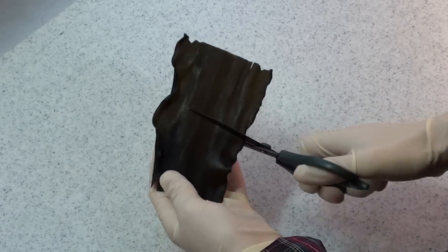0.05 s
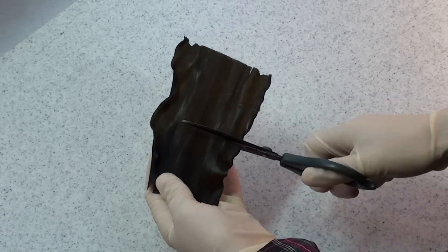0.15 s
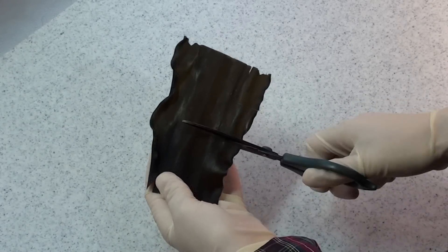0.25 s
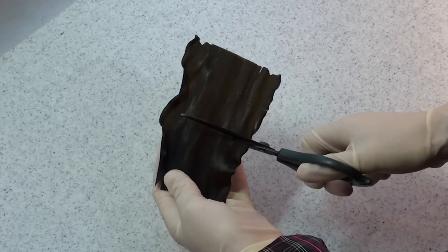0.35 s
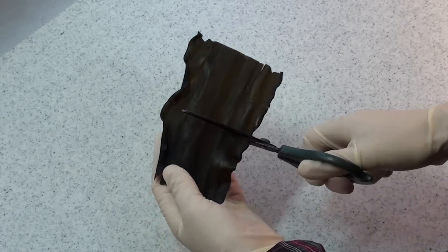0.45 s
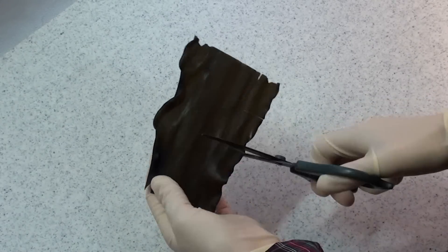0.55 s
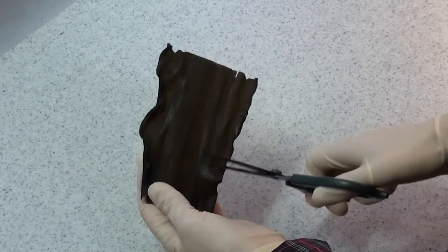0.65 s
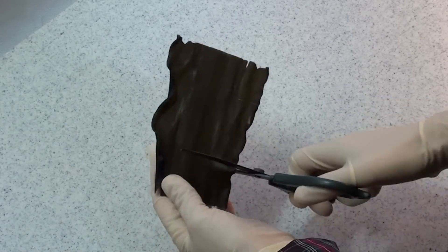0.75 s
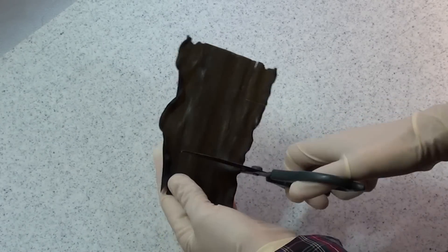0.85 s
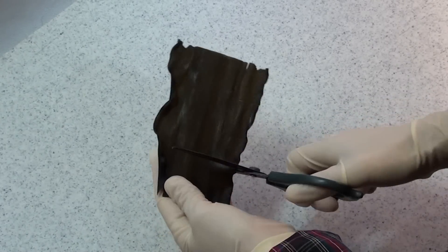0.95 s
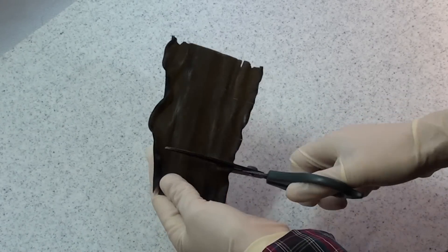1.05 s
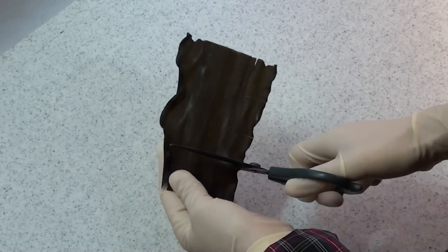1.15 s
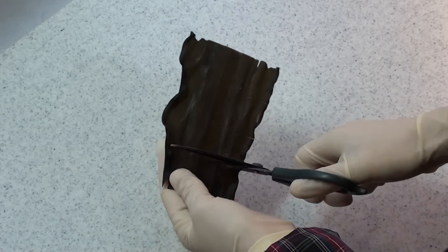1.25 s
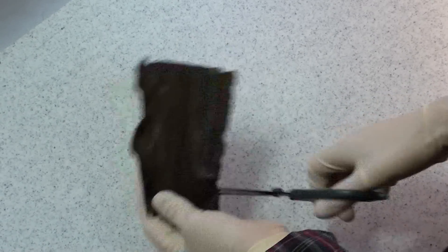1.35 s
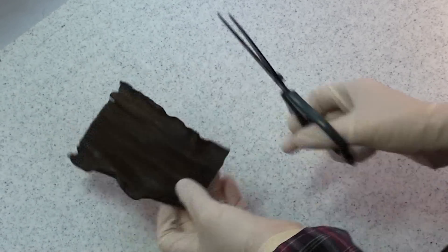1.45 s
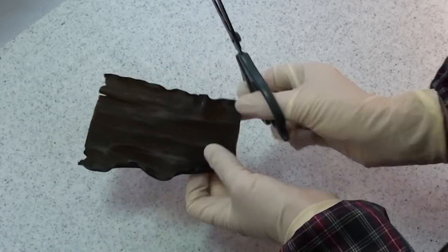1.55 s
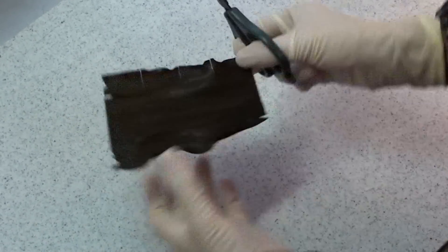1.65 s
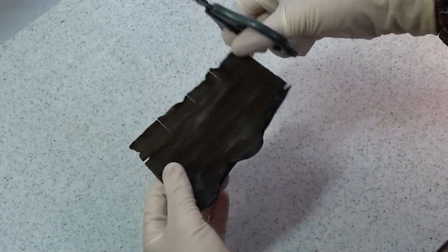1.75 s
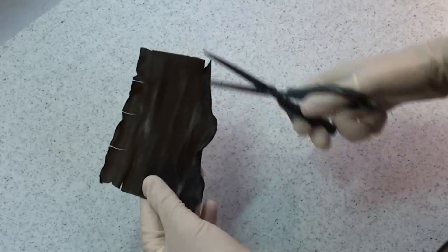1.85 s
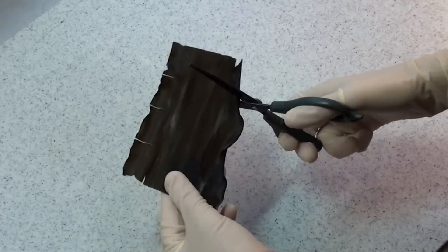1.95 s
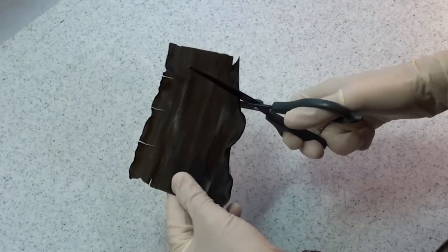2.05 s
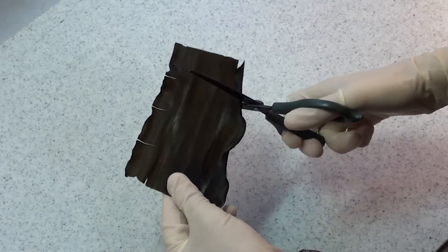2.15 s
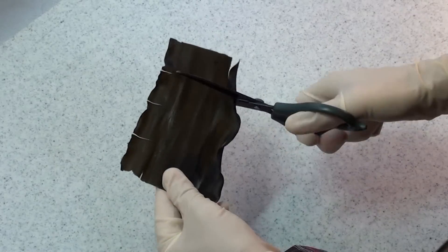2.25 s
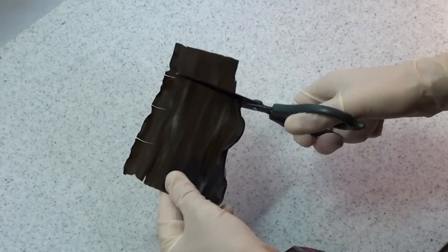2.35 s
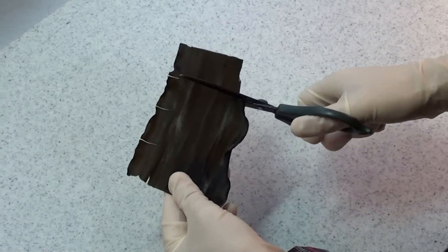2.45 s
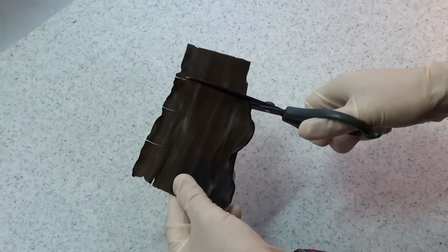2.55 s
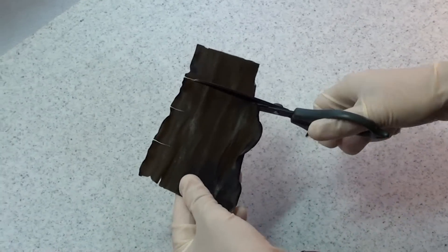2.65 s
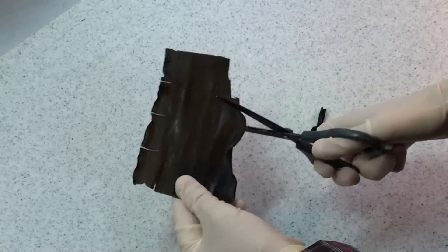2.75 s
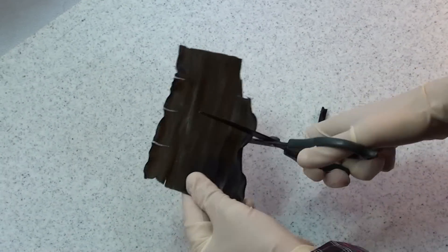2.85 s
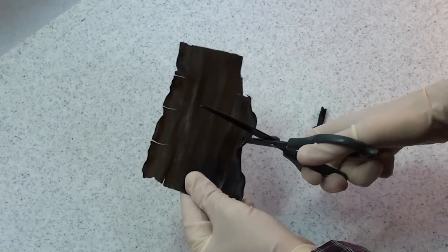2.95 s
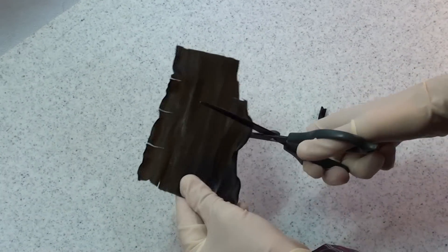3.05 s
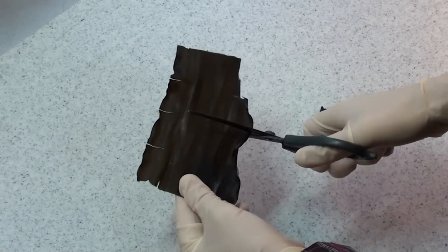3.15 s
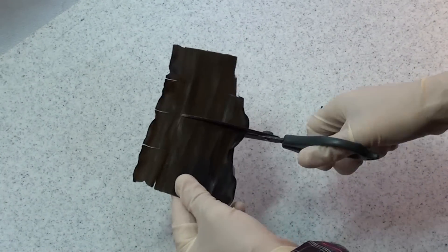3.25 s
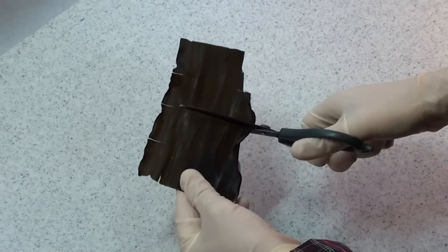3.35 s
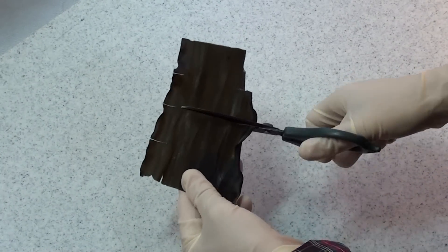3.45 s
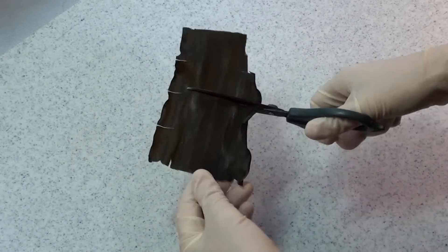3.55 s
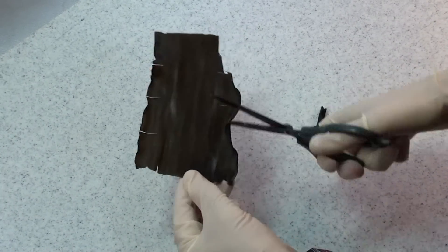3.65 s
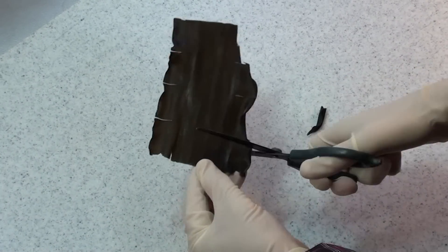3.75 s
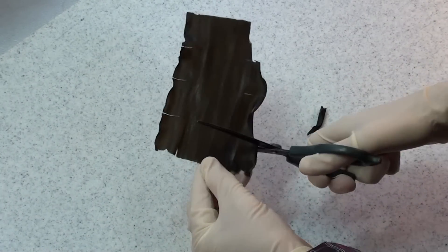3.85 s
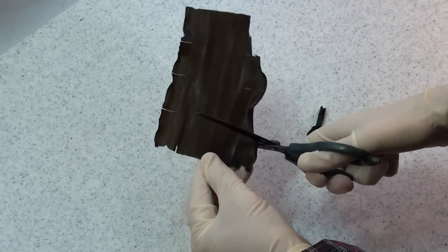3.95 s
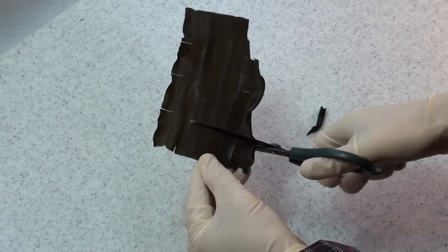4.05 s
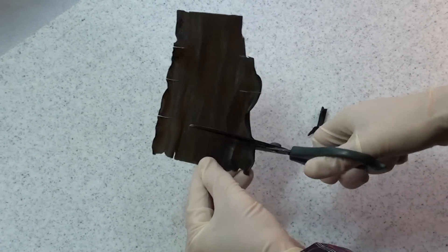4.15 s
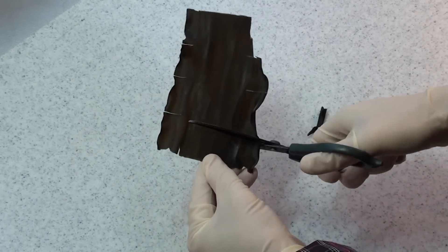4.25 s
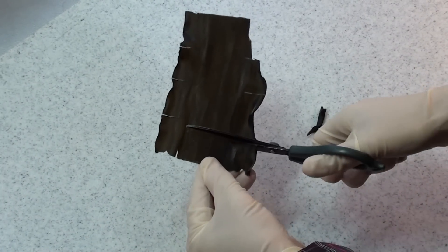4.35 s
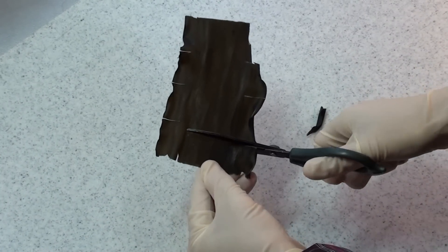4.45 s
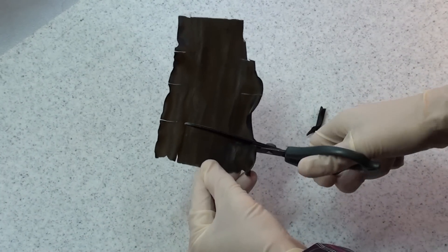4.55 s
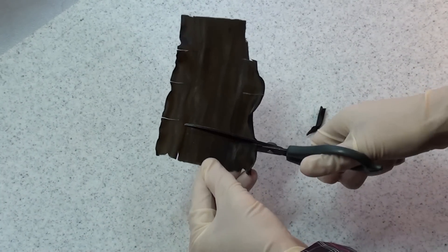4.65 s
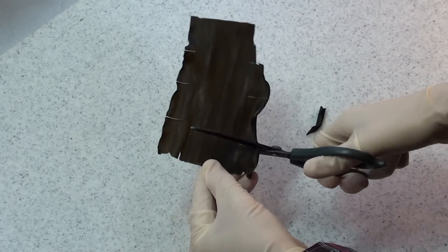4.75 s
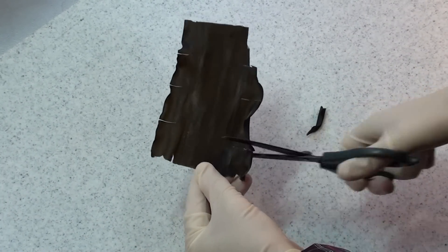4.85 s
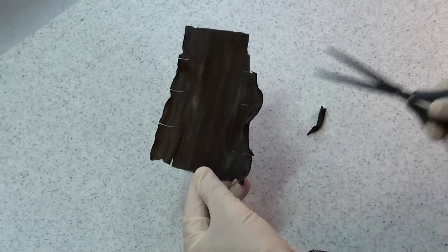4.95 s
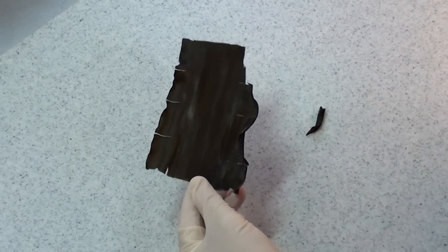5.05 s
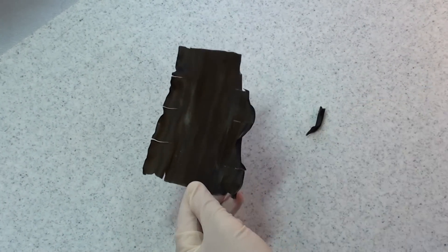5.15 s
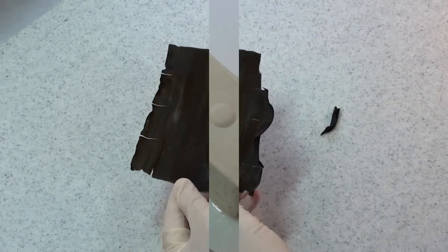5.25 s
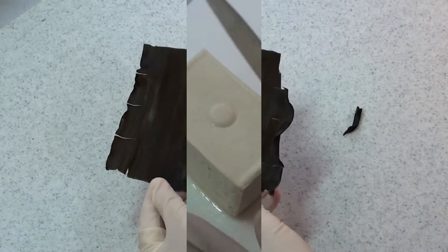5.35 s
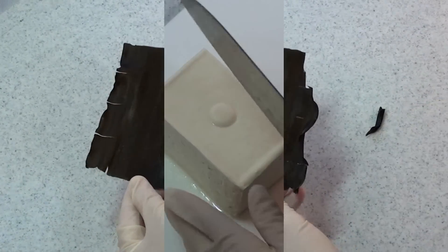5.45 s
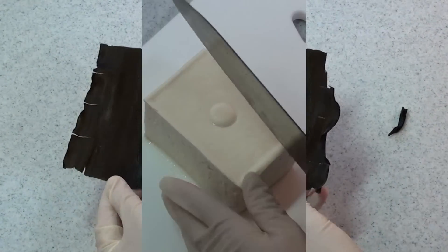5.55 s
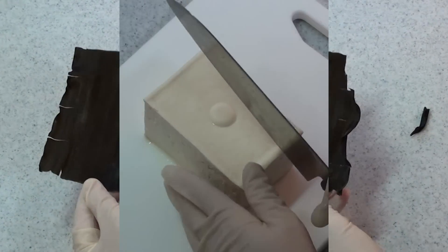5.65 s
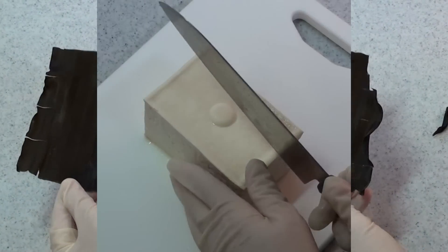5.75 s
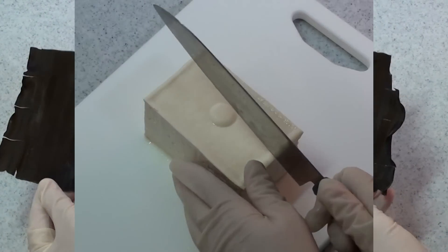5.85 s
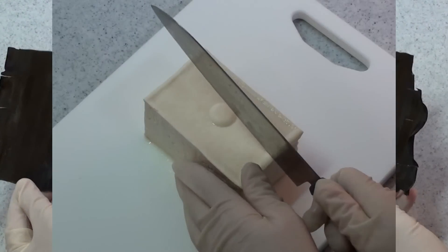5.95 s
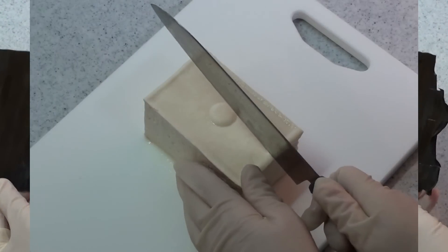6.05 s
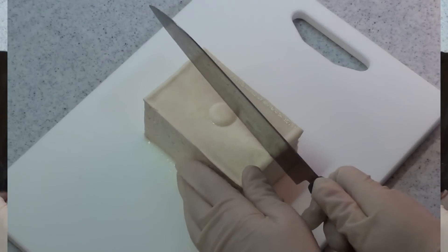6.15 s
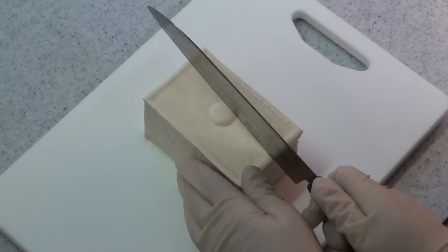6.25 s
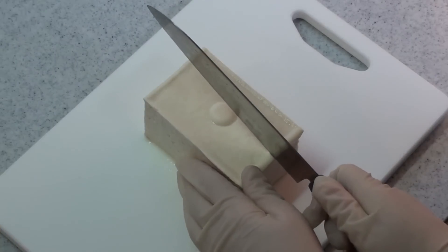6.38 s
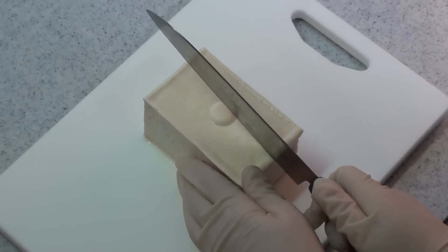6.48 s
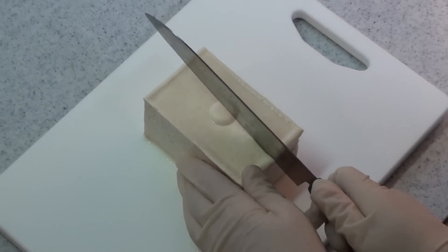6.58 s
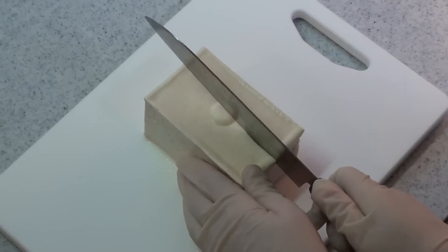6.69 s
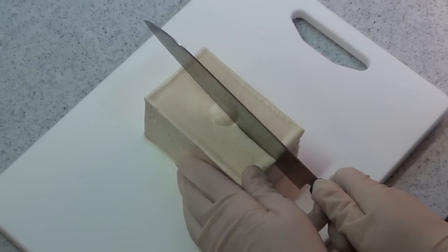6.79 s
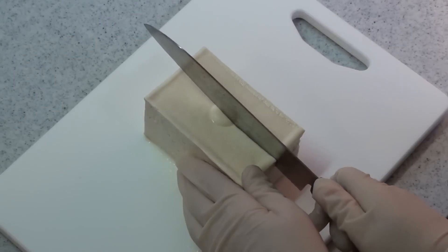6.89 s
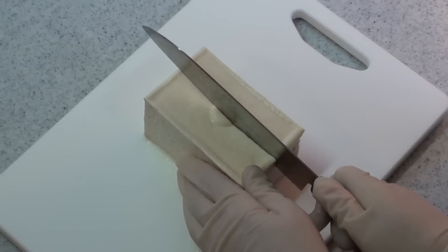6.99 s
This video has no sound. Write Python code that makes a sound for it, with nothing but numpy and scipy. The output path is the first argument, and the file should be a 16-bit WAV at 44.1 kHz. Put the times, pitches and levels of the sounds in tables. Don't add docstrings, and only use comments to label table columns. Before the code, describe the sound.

Sharp dry snaps and small crunches of cutting stiff dried kelp, a sudden change to deeper fridge rumble, a soft glove rub, a knife knock.

```python
import sys
import numpy as np
from scipy import signal
from scipy.fft import rfft, irfft, next_fast_len
from scipy.io import wavfile
from scipy.ndimage import uniform_filter1d

SR = 44100
rng = np.random.default_rng(int(sys.argv[2]) if len(sys.argv) > 2 else 0)


def transcribe(signal):
    frames = np.atleast_2d(signal).T
    limited = np.clip(frames, -1, 1)
    pcm = np.round(limited * 32767).astype(np.int16)
    wavfile.write(sys.argv[1], SR, pcm)


def ratio(d):
    e = np.asarray(d, float) / 20
    return 10 ** e


N = 309582

# [t/s, level/dB, blade share/dB, brittleness/dB]
CRUNCHES = [(.138, -49.5, 8, 0), (.2675, -50.5, 8.5, -17), (0.5465, -31.5, 6.5, -22), (.6293, -49, -17, 10),
            (0.6688, -57, 10, 6), (0.824, -64, 4, -2), (1.0203, -39, -5, 2), (1.0318, -32, 2, 0),
            (1.2255, -51, 7, -15), (1.27, -49, 1, -5), (1.376, -42.5, 6, -10), (1.4564, -52, 6, 7),
            (1.785, -53, 8, 3), (1.9912, -44.5, 9, 2), (2.0003, -42, 1.5, -7), (2.16, -47, 3, -9),
            (2.259, -43, -5, 0), (2.2997, -42.5, 1, 10), (2.3055, -31, 6, 0), (2.3175, -38, 5, 1),
            (2.3254, -27, 3, 4), (2.4115, -45, -11, 2), (2.3009, -43, 9, 4), (3.343, -44, -19, -15),
            (3.619, -44, 9.5, -5), (3.6322, -47.5, -15, 0), (3.8796, -43.5, -10, -12), (4.621, -49, 6, -9),
            (4.7906, -56, 12, -15), (3.928, -48.5, 2, -12), (3.9782, -48, 5, -2), (2.123, -44, 0, 0),
            (4.4312, -46, -15, 17), (1.3123, -51, 1, -5), (2.3306, -47, -7, 3)]
TEARS = [(0.149, -58, 1, 7), (0.312, -52, 4, -5), (0.3227, -50, -3, 8), (0.484, -49, -14, 10.5),
         (0.6232, -38, -19, 2), (1.022, -36, -8, -5), (1.0392, -26, 6.5, -4), (1.0415, -33, -4, 6),
         (1.1547, -46, 6, 2), (1.3016, -49, 7, -1), (1.417, -48, -4, 2), (1.443, -41, -8, -1),
         (1.5589, -55, -6, 5), (1.658, -45, 11.5, 3), (1.8622, -59, -11, 14), (2.435, -48, -17, -1),
         (2.332, -36.5, 11.5, 5), (2.4135, -42, -13, 2), (2.7368, -46, 3, -3), (2.8734, -62, -6, 14),
         (3.1266, -49.5, -9, 7), (3.2193, -48, 4, 12.5), (3.3207, -35.5, -2.5, -8), (4.224, -48, 4, -2),
         (4.346, -51, -13, -4), (4.1454, -50, -6, 3), (4.3216, -49, -8, 2), (1.6348, -56, 3, -3)]
FLAKES = [(.1665, -57.5, 12.5, -8), (.218, -52, 4, -10), (2.061, -55, 12, -1), (2.7266, -48, -15, -10),
          (2.917, -62, -8, 9), (3.8665, -56, -4, 5), (3.912, -50, 0, 0), (2.3809, -38, -13, 2),
          (.626, -43.5, -15, 0), (0.8258, -49.5, 19, -9), (1.3885, -55, 3, -8), (1.3954, -43.5, -2, 4),
          (1.61, -58, -8, 8), (1.665, -54, 2, 4), (1.671, -57, -6, 4), (1.771, -63, -10, 12),
          (1.4225, -54, -3, 4), (2.4478, -52, -10, -4), (2.4676, -53, -15, 4), (2.594, -57, -8, 2),
          (2.7383, -45.5, 4.5, 0), (2.7442, -48, 0, 5), (3.2627, -48, -3, 0), (4.3515, -48, -8, 4),
          (4.4379, -50, -15, 8), (1.0896, -41, 2, -3), (0.5487, -39, 8, -5)]
# [shower t60/s, topmost over crisp zone/dB]
FRACTURE_KINDS = [
    (0.0079, 0.5),
    (0.012, -6),
    (0.0071, 2),
]
# [t/s, level/dB, blade share/dB, brittleness/dB, topmost zone/dB]
SNAPS = [(.5436, -33, 1, 8.5, -12), (.7202, -33.5, 4.5, 3.5, 0), (.7208, -36, 1, -5, 0),
         (1.021, -25, -9, -1, 12), (1.0222, -30, 3, -3, 0), (1.0364, -28, -1, 0, 5),
         (1.0371, -32, -10, -3, 3), (1.0858, -30.5, -1, 0.5, -2), (1.0863, -33.5, 1.5, 0, -3),
         (1.2125, -39, 8, -6, 2), (1.214, -36, -2, -7, 6), (1.2205, -44, 6, -15, 0),
         (1.2302, -40, 1, -5, 0), (1.2366, -46, 8, -4, 0), (1.2599, -38, 9, -6, 0),
         (1.2612, -35, -12, -4, 0), (1.266, -36, 2, 0, -6), (1.3069, -35.5, -2, -3, 1),
         (1.3926, -43, 1, -1, 5), (1.529, -43.5, -21, 2.5, 0), (1.6167, -43.5, 2.5, -2, 3),
         (1.824, -46.5, 0, 2.5, 4),
         (2.0068, -40, -3, -20, -2), (2.126, -32, -5, 0, -2), (2.3029, -32.5, 3, 6, 13.5),
               (2.316, -20.5, 1.5, 3, -12), (2.3239, -33.5, 6, 7, -3), (2.327, -32, 3, 0, 0),
               (2.3823, -30.5, -19, -1, 7), (2.3847, -41, -11, 3, 5), (2.389, -47, -23, 10, 0),
               (2.421, -50, -14, 2, 4), (2.4628, -41, -24, 2, 7), (2.4984, -44, 7, 4, 6),
               (2.848, -55, -3, 10, 0.5), (3.1292, -45, 11.5, -20, 0), (3.251, -47, -7, 1, 0),
               (3.2603, -42.5, -1, 7, -3), (3.8491, -47.5, 7.5, -7, 6), (4.1316, -47, -14, 3, 9),
               (4.1892, -38, -29, -3, 0), (4.3482, -41, -4, 2, 12), (4.3496, -37, -8, -1, 6),
               (4.4321, -33.5, -24, 13, 3.5), (4.5112, -30.5, -10.5, 1, -5), (3.2229, -42.5, 2.5, 9, -8)]
# [loudest t/s, length/s, level/dB, brightness/dB]
RUBS = [(0.14, 0.11, -63.5, -17), (0.322, 0.028, -54, -3), (0.525, 0.049, -69, 4), (0.626, 0.045, -71, 8),
        (3.904, .1, -71, -2), (1.47, .25, -74, 3), (0.664, .04, -73, 8), (1.425, 0.028, -75, 7),
        (1.555, .04, -77, 10), (1.034, 0.027, -42, -4), (1.156, 0.053, -53, -10), (1.384, 0.073, -58.5, -6),
        (1.444, 0.07, -68, -4), (1.522, 0.2, -67, -3), (1.643, 0.31, -71, 3), (1.81, 0.22, -70, -5),
        (2.166, 0.034, -60, -12), (2.331, 0.058, -48, 2), (2.741, 0.024, -56.5, 1.5),
        (2.871, 0.04, -73.5, 9), (3.124, 0.017, -66, 14), (3.227, 0.045, -64, -10), (3.331, 0.033, -59, -3),
        (3.648, 0.13, -65, -6), (3.865, 0.037, -65, -4), (4.22, 0.031, -61, -6), (4.575, 0.25, -68, -5),
        (4.786, 0.019, -54, -15), (4.869, 0.045, -70.5, 4)]
# [t/s, peak level/dB, f/Hz]
KNOCKS = [(0.55, -44, 1040), (.7205, -49, 840), (1.4, -38.5, 1700), (1.1, -38, 2250), (1.2301, -37, 1750),
          (1.2302, -39, 2400), (1.0859, -31.5, 2250), (2.3242, -30, 2330), (2.2998, -31, 2880),
          (1.804, -50, 1500), (1.8046, -45.5, 806), (2.1255, -43, 940), (2.1259, -25.5, 3130),
          (2.1264, -29, 2360), (2.324, -38, 1600), (1.3072, -37, 1860), (.7205, -55, 1500),
          (0.55, -44, 1790), (.544, -41, 3500), (2.316, -50, 1100), (2.737, -44.5, 1030), (3.13, -54, 970),
          (3.62, -52, 900), (4.3476, -14, 15700), (4.348, -45.5, 1600), (4.349, -10, 14800),
          (4.349, -43, 2500), (4.3494, -29, 6600), (4.4324, -46.5, 890), (4.432, -50, 1200),
          (4.433, -29.5, 4500), (4.433, -41.5, 1840), (4.5102, -35, 4600), (4.512, -42.5, 1650),
          (4.621, -51, 860), (5.824, -42, 1060), (5.8745, -51, 190), (1.0209, -18, 13300),
          (2.3028, -20, 13600), (2.4, -18, 9500), (1.0366, -32, 2390), (1.2608, -40, 2400),
          (1.215, -40, 2460), (4.4326, -23, 10100), (4.349, -22, 13000), (6.879, -45, 4900)]
# [t/s, board level/dB, steel share/dB, t60/s]
KNIFE_TAPS = [
    (5.607, -32, 1, 0.017),
    (5.6114, -36, -14, 0.026),
    (6.877, -67.5, 15, 0.0075),
]
# [t/s, pressure level/dB, slow over fast rub/dB]
GLOVE_SLIDE = [
    (5.237, -52.5, -6),
    (5.3, -53.5, -4),
    (5.43, -51.5, -5),
    (5.54, -54, -8),
    (5.62, -53.5, 1),
    (5.69, -56.5, 1),
    (5.74, -69, 3),
    (5.85, -66, 0),
]

# [f/Hz, width/Hz, level/dB]
BLADE_MODES = [(1645, 200, -6), (2130, 228, 2), (2400, 200, 5.5), (2705, 230, -1.5), (3120, 320, -3)]
SHEET_MODES = [(3780, 170, 0.5), (4604, 230, 1.5), (5660, 390, -0.5), (6370, 290, 2.5), (7000, 260, -3),
               (7650, 320, -1), (8570, 240, -7)]
CRISP_MODES = [(9180, 480, 2.5), (10170, 750, 3.5), (11000, 750, 0.5), (12000, 640, -2)]
TOPMOST_MODES = [(12400, 600, -2), (13360, 530, 0), (13370, 380, 7.5), (14200, 600, 0.5), (14900, 400, 0),
                 (15350, 400, 3), (16300, 360, -13)]
AIR_MODES = [(5500, 5500, 0)]
# [f/Hz, width/Hz, level/dB]
BOARD_MODES = [(390, 130, -2.5), (800, 160, 0), (1030, 150, 0), (1280, 200, -7), (1560, 180, -3),
               (1860, 180, 1), (2190, 280, -0.5), (2560, 260, 3.5)]
STEEL_MODES = [(3100, 400, -4), (3690, 240, 1.5), (4050, 300, -3.5), (4600, 600, -9), (5440, 450, -10),
               (5960, 320, -2), (7300, 500, -16)]
BLOCK_MODES = [(295, 71, -2.5), (470, 150, -3.5), (800, 150, -5), (1060, 180, -3), (1420, 100, -3),
               (1580, 91, -7), (1830, 110, -3)]

# [f/Hz, level/dB per Hz]
HISS = [(2500, -42), (3400, -6), (5000, -4), (7400, 0.5), (10000, -8), (14000, -21)]
SCRAPE = [(150, -18), (300, -3.5), (700, 1.5), (2500, -1.5), (3500, -5), (5000, -40)]
DRAG = [(3000, -40), (4300, -8), (5800, -5), (7000, -5), (9000, -25)]

# [t/s, rms level/dB]
WHINE_LEVEL = [(5.25, -65), (5.6, -76), (5.75, -66.5), (7.02, -69)]
# [t/s, level/dB]
BACKGROUND_GAIN = [(0, 2), (.6, 3), (2, 3), (5.2, 2.5), (7.02, -1)]
# [f/Hz, level/dB per Hz]
COUNTER_NOISE = [(25, -25), (60, -18), (90, -14), (125, -6.5), (200, -1), (330, -0.5), (500, -0.5),
                 (800, 3), (1400, 0.5), (2500, 0), (5000, -2.5), (10000, -6.5), (14500, -7)]
TABLE_NOISE = [(20, -11), (60, -17), (92, 0.5), (130, -9), (230, -6), (430, -9), (800, -9), (1500, -11.5),
               (3200, -16), (4650, -15.5), (6000, -18), (12500, -20), (14500, -23)]
# [f/Hz, correlation]
COUNTER_ALIKE = [(60, 1), (300, 0.91), (640, 0.72), (1400, 0.17), (3100, 0.041), (6800, 0.21),
                 (15000, 0.76)]
TABLE_ALIKE = [(60, 1), (130, 0.93), (290, 0.55), (640, 0), (1400, 0), (3100, 0.46), (6800, 0.92),
               (15000, 0.99)]
# [f/Hz, rms level/dB, unsteadiness/Hz]
COUNTER_LINES = [(90, -80, 3), (269.5, -66, 1), (332, -78, 2), (360, -76, 1), (720, -80, 3), (2518, -82, 2),
                 (7556, -68.5, 1)]
TABLE_LINES = [(87.7, -65.5, 4.4), (840, -75, 2.47), (4650, -76, 24.3)]
# [f/Hz, t60/s]
WALLS = [(800, 0.074), (2400, 0.056), (6000, 0.078), (15000, 0.06)]
# [t out/s, t in/s, t fully in/s]
CHANGE = (5.2298, 5.237, 5.247)
# [f/Hz, level/dB]
TREBLE_GATE = [(14400, -82), (15250, -79), (15400, -62), (16000, -66), (16100, -59.5), (16700, -57),
               (17000, 0)]


def unit(x):
    return x / np.sqrt(np.mean(x ** 2) + 1e-20)


def along(points, hz):
    f, v = np.transpose(points)
    return np.interp(np.log(hz + 1), np.log(f + 1), v)


def wobble(rate):
    knots = rng.standard_normal(round(N / SR) * 60)
    return np.interp(np.arange(N) * rate / SR, np.arange(len(knots)), knots)


def filtered(x, response):
    m = next_fast_len(N + SR // 2)
    return irfft(rfft(x, m) * response(np.fft.rfftfreq(m, 1 / SR)), m)[..., :N]


def ringing(x, modes):
    def response(f):
        h = 0
        for k, (centre, width, db) in enumerate(modes):
            resonance = 1j * f * width / (centre * centre - f * f + 1j * f * width)
            h = h + (-1) ** k * ratio(db) * resonance
        return h / np.sqrt(np.mean(np.abs(h) ** 2))
    return filtered(x, response)


def rush(spectrum, alike):
    def mid_side(hz):
        turn = np.arccos(np.clip(along(alike, hz), -1, 1)) / 2
        return ratio(along(spectrum, hz)) * [np.cos(turn), np.sin(turn)]
    mid, side = filtered(rng.standard_normal((2, N)), mid_side)
    return unit(np.array([mid + side, mid - side]))


def bursts(times, db, t60, snap_db):
    t = np.arange(SR // 20) / SR
    t60 = np.maximum(t60, .002)[:, None]
    unevenness = uniform_filter1d(rng.standard_normal((len(times), len(t))), size=16)
    clumps = ratio(2.5 * 4 * unevenness)
    swell = (1 - np.exp(-t / (0.028 * t60))) * ratio(-60 * t / t60)
    swell = swell * np.sqrt(0.0072 / t60)
    where = ((times * SR).astype(int)[:, None] + np.arange(len(t))).ravel()
    out = []
    for level, snap in zip(db, snap_db):
        shower = rng.standard_normal(clumps.shape) * clumps * swell
        shower[:, 0] = -ratio(snap) * 0.0042 / t60[:, 0]
        out.append(np.bincount(where, (ratio(level)[:, None] * shower).ravel(), N + SR)[:N])
    return out


def cracks():
    rows = []
    for table, kind in zip([CRUNCHES, TEARS, FLAKES], FRACTURE_KINDS):
        rows += [(*row, *kind) for row in table]
    snap_t60_s = 0.0055
    rows += [(*row, snap_t60_s, top_db) for *row, top_db in SNAPS]
    s, db, blade_db, brittle_db, t60, top_db = np.transpose(rows)

    topmost_db = db + 1.03 * brittle_db + top_db - 1.5
    levels = [db + 0.32, db + blade_db - 4.5, db + brittle_db - .6, topmost_db]
    showers = bursts(s, levels, t60, snap_db=[15, 20, 15, 13])
    bodies = [SHEET_MODES, BLADE_MODES, CRISP_MODES, TOPMOST_MODES]

    start = (s * SR).astype(int)
    steps = np.bincount(start, -ratio(db + 8) * (0.0044 / t60) ** 1.1, N)
    sparks = np.bincount(start, -ratio(db + brittle_db + 10) * (0.005 / t60) ** 0.84, N)
    air = ringing(steps, AIR_MODES) + ringing(sparks, [(11500, 9600, 0)])
    dry = air + sum(map(ringing, showers, bodies))

    echo_s, echo_db = .0013, -17.5

    def radiated(f):
        thin = (1j * f / (1j * f + 900)) ** 2
        return thin * (1 + ratio(echo_db) * np.exp(-2j * np.pi * f * echo_s))
    return filtered(dry, radiated)


def rubs():
    t, dull, bright = np.arange(N) / SR, np.zeros(N), np.zeros(N)
    rise_share = 0.41
    for s, length, db, bright_db in RUBS:
        rise, fall = rise_share * length, (1 - rise_share) * length
        distance = np.where(t < s, (s - t) / rise, (t - s) / fall).clip(0, 9)
        stroke = ratio(db - 20 * distance)
        dull += stroke
        bright += stroke * ratio(bright_db)
    clumps = ratio(17.1 * uniform_filter1d(rng.standard_normal(N), size=30))
    grit = rng.standard_normal((3, N)) * clumps
    low = ringing(dull * grit[0], SHEET_MODES) + ratio(2.0) * ringing(dull * grit[1], BLADE_MODES)
    return low + ratio(8.0) * ringing(bright * grit[2], [(11200, 9800, 0)])


def knocks():
    out, t = np.zeros(N + SR), np.arange(SR // 10) / SR
    for s, db, hz in KNOCKS:
        t60 = 0.029 * (1000 / hz) ** 0.72
        envelope = ratio(db - 60 * t / t60) * (1 - np.exp(-t / 0.0001))
        out[round(s * SR):][:len(t)] += envelope * np.sin(2 * np.pi * hz * t)
    return filtered(out[:N], lambda f: (1j * f / (1j * f + 150)) ** 2)


def board():
    s, db, steel_db, t60 = np.transpose(KNIFE_TAPS)
    blows = bursts(s, [db, db + steel_db], t60, snap_db=[8, 6])
    rock = np.arange(4)
    block_s, rock_s, block_t60_s = 5.823, .016, 0.03
    block_db, rock_loss_db = -43, 4.5
    blows += bursts(block_s + rock_s * rock, [block_db - rock_loss_db * rock],
                    block_t60_s * 1.08 ** rock, snap_db=[7])
    bodies = [BOARD_MODES, STEEL_MODES, BLOCK_MODES]
    ranges = [[(1690, 3500, 0)], [(4600, 4800, 0)], [(700, 1600, 0)]]
    return sum(ringing(ringing(blow, modes), soft) for blow, modes, soft in zip(blows, bodies, ranges))


def slide():
    s, db, slow_db = np.transpose(GLOVE_SLIDE)
    t = np.arange(N) / SR
    pressure = ratio(np.interp(t, s, db, -120, -120) + .8 * wobble(33))
    slow = 1 / (1 + ratio(-2 * np.interp(t, s, slow_db)))
    alike = [(3000, .75), (7000, 0.88), (15000, .98)]
    fast_rub = rush(HISS, alike) + ratio(-3) * rush(SCRAPE, [(300, 0.84), (1000, 0.9)])
    slow_rub = rush(DRAG, alike)
    return pressure * (np.sqrt(1 - slow) * fast_rub + np.sqrt(slow) * slow_rub)


def room(x, alike):
    hop, out = SR // 3, np.zeros((2, N + SR))
    for start in range(0, N, hop):
        hz, t, z = signal.stft(rng.standard_normal((2, SR // 5)), SR, nperseg=128)
        decay = ratio(-60 * t / along(WALLS, hz)[:, None])
        a, b = signal.istft(z * decay, SR, nperseg=128)[1]
        tail = np.array([a + alike * b, a - alike * b]) / np.linalg.norm(a)
        echo = signal.fftconvolve(x[None, start:start + hop], tail, axes=1)
        out[:, start + 100:start + 100 + echo.shape[1]] += echo
    return out[:, :N]


def whine():
    t = np.arange(N) / SR
    level = ratio(np.interp(t, *np.transpose(WHINE_LEVEL)) + 1.5 + 1.4 * wobble(4.5))
    cycles = 2530 * t + np.cumsum(0.62 * wobble(12)) / SR
    return level * np.sin(2 * np.pi * cycles)


def background(spectrum, alike, lines, db):
    t = np.arange(N) / SR
    hum = 0
    for hz, level, drift in lines:
        swell = ratio(level - 1.5 + 0.81 * wobble(4.5))
        cycles = hz * t + np.cumsum(drift * wobble(12)) / SR
        hum = hum + swell * np.sin(2 * np.pi * cycles)
    gain = ratio(np.interp(t, *np.transpose(BACKGROUND_GAIN)))
    return gain * (ratio(db) * rush(spectrum, alike) + hum)


def scene():
    t = np.arange(N) / SR
    near = cracks() + rubs() + board() + knocks()
    near = near * ratio([[.35], [-.35]]) + ratio(-6.5) * room(near, 0.49)
    before = np.interp(t, [CHANGE[0] - .001, CHANGE[0]], [1, .15])
    after = np.interp(t, CHANGE[1:], [0, 1])
    counter = background(COUNTER_NOISE, COUNTER_ALIKE, COUNTER_LINES, db=-59.5)
    table = background(TABLE_NOISE, TABLE_ALIKE, TABLE_LINES, db=-56)
    return near + before * (1 - after) * counter + after * (table + slide() + whine())


def treble_gate(x):
    hz, _, z = signal.stft(x, SR, nperseg=1024)
    power = np.mean(np.abs(z) ** 2, axis=0)
    power = uniform_filter1d(power, size=15, axis=0)
    power = np.abs(uniform_filter1d(power, size=3, axis=1))
    loud_enough = power > ratio(along(TREBLE_GATE, hz))[:, None] ** 2
    kept = (hz[:, None] < TREBLE_GATE[0][0]) | loud_enough
    return signal.istft(z * kept, SR, nperseg=1024)[1][:, :N]


def top_cut(x):
    return signal.sosfilt(signal.butter(12, 17010, fs=SR, output="sos"), x)


def record(dry):
    mix = treble_gate(dry)
    return top_cut(mix)


dry = scene()
out = record(dry)
transcribe(out)
```